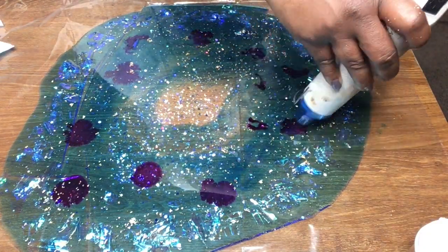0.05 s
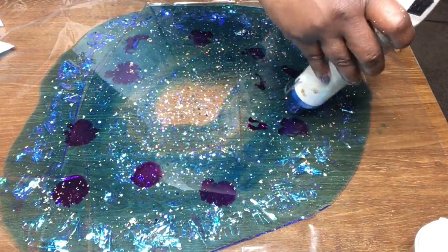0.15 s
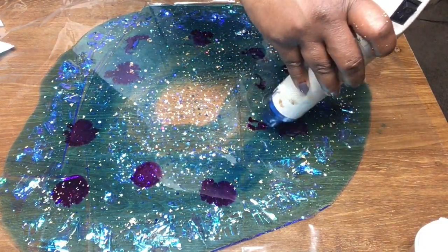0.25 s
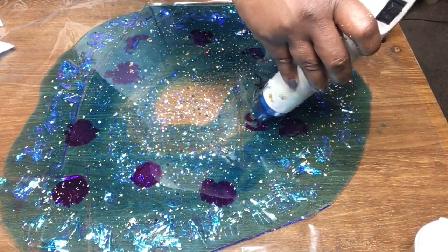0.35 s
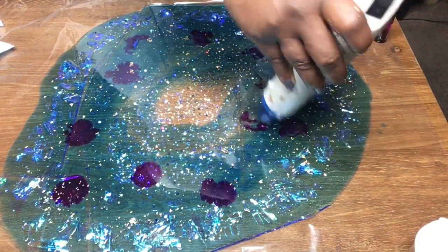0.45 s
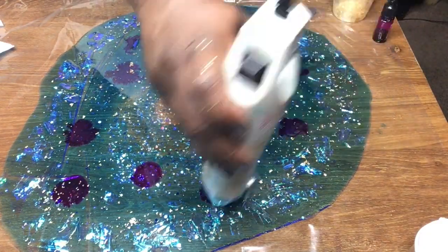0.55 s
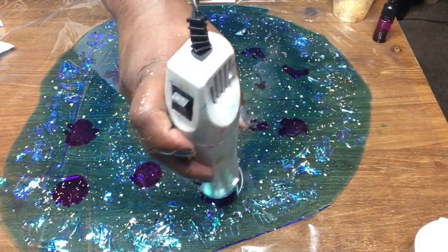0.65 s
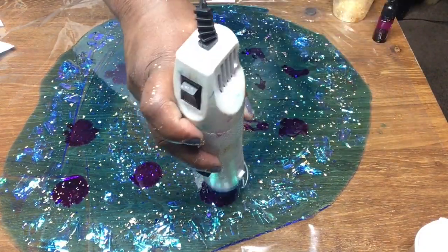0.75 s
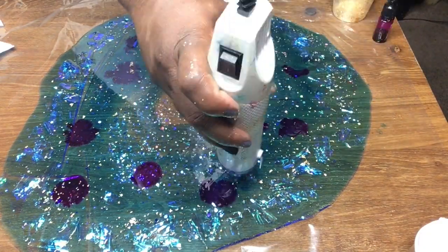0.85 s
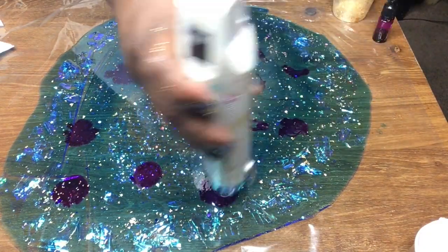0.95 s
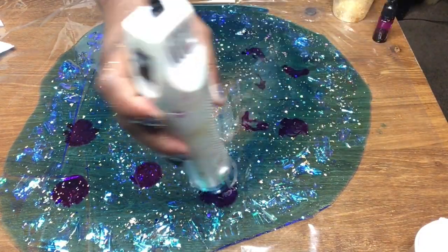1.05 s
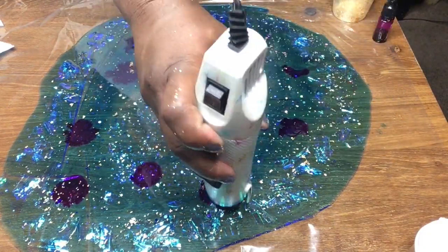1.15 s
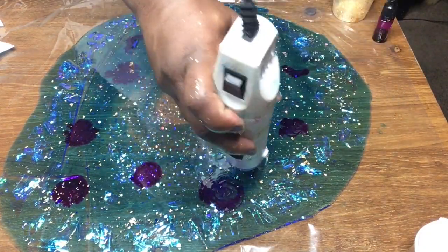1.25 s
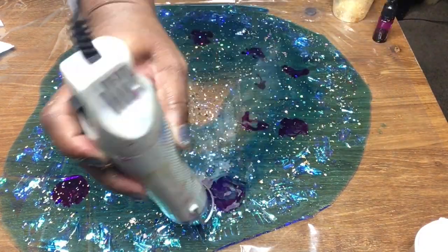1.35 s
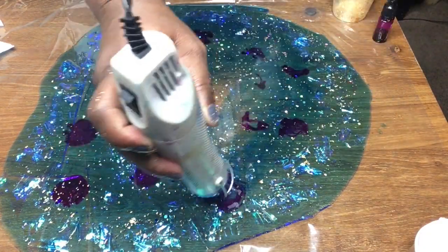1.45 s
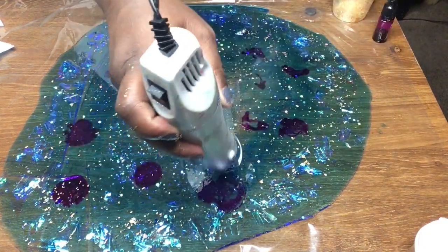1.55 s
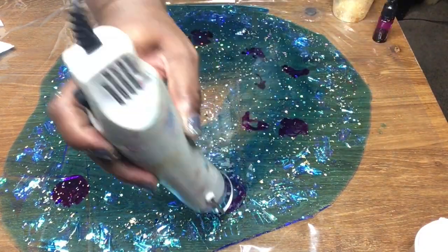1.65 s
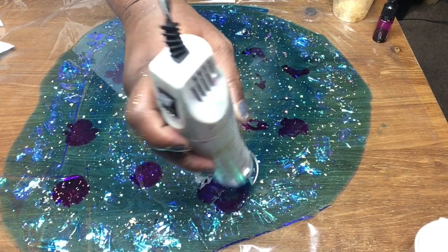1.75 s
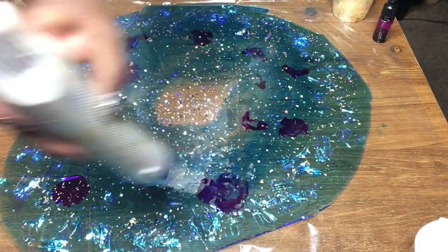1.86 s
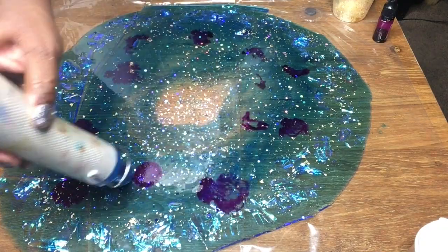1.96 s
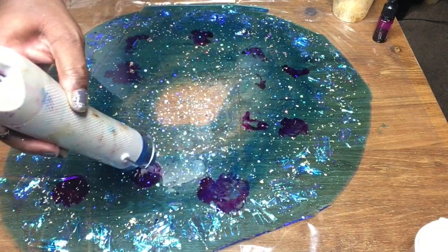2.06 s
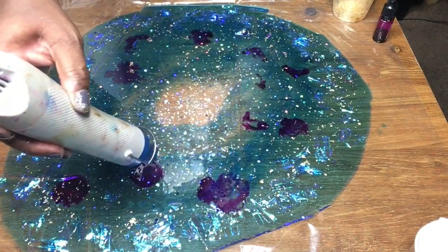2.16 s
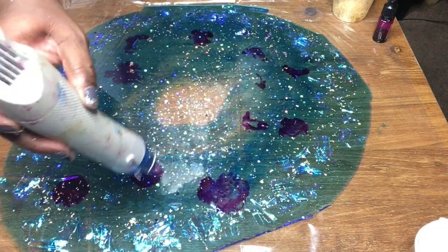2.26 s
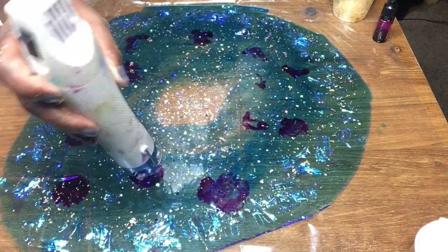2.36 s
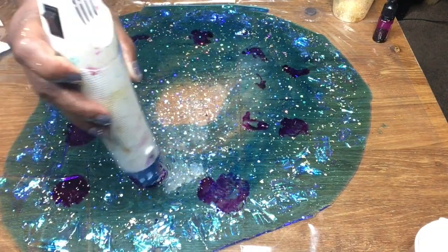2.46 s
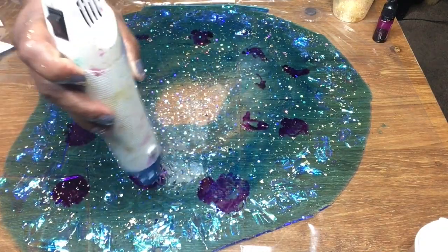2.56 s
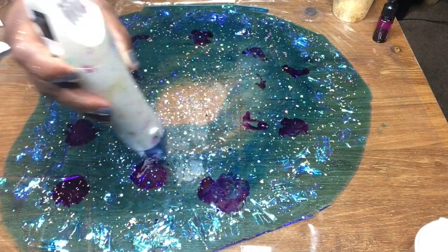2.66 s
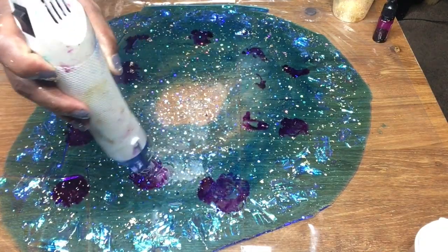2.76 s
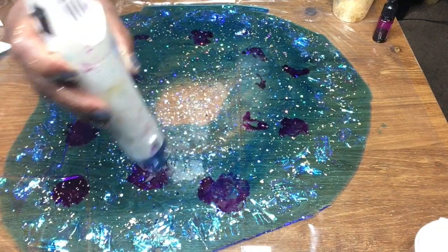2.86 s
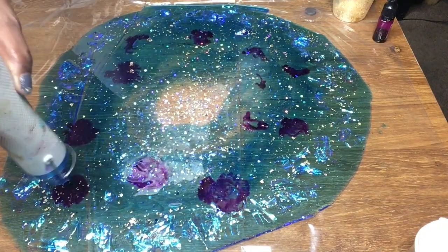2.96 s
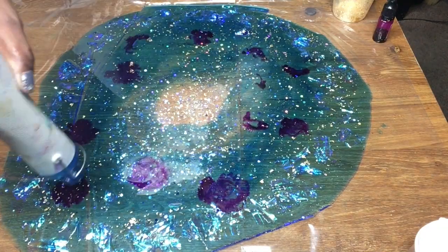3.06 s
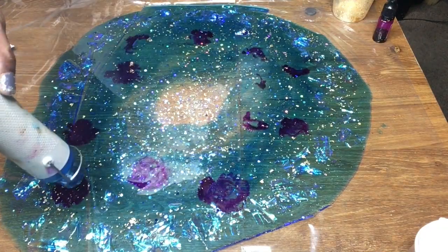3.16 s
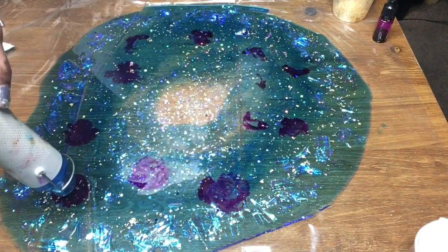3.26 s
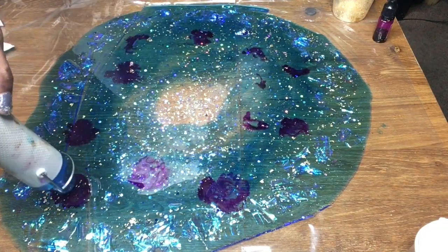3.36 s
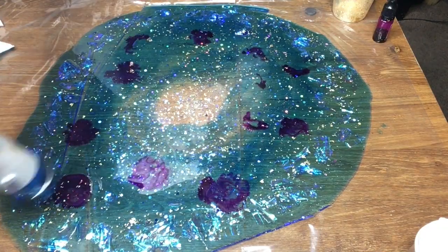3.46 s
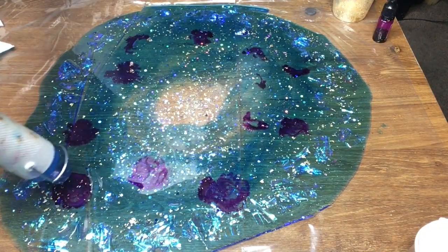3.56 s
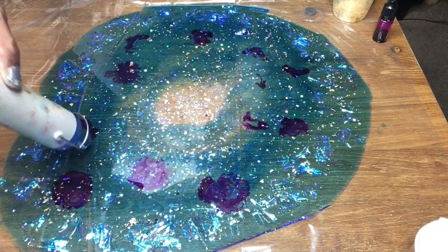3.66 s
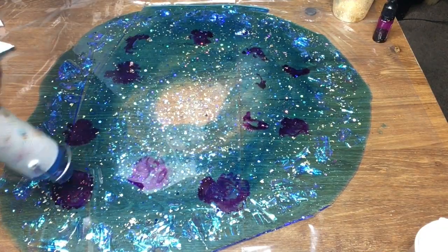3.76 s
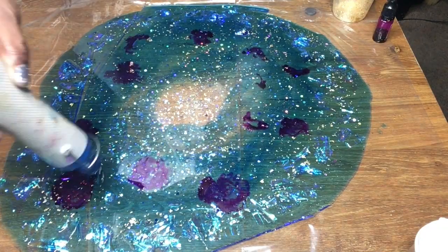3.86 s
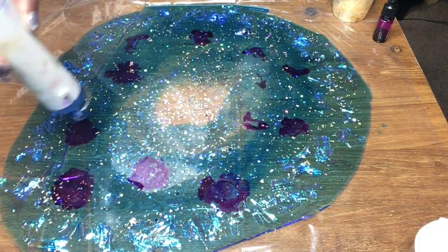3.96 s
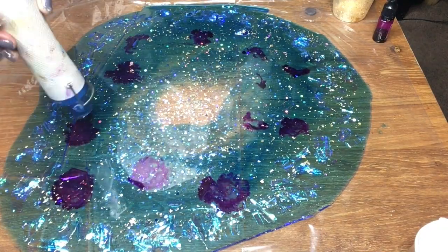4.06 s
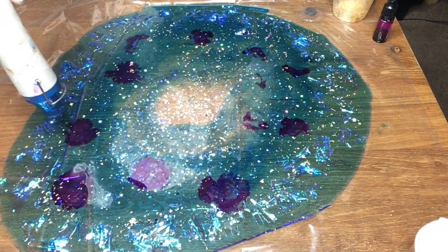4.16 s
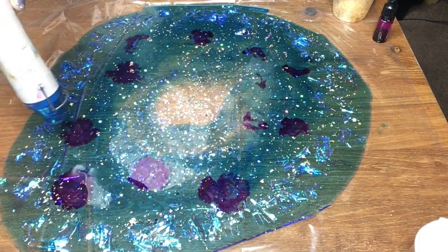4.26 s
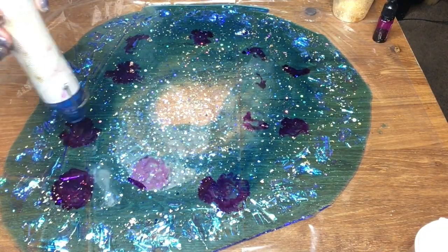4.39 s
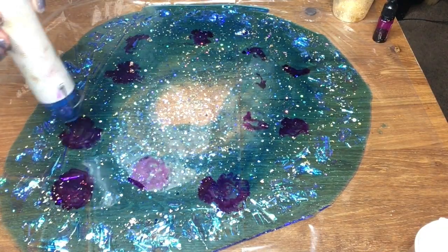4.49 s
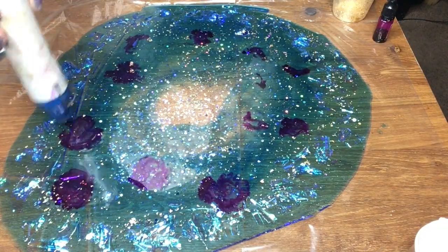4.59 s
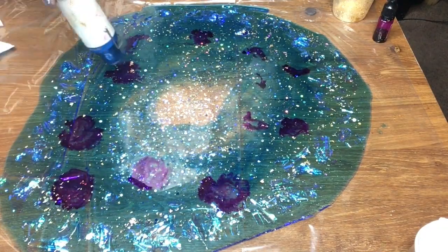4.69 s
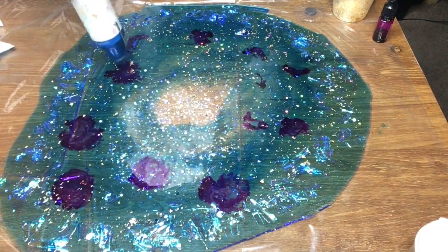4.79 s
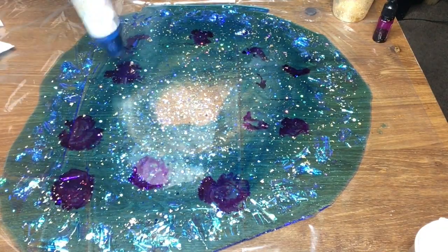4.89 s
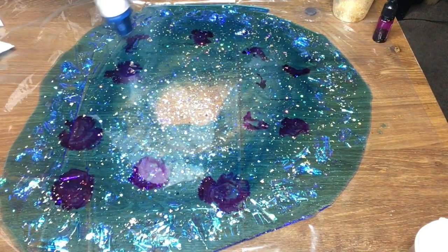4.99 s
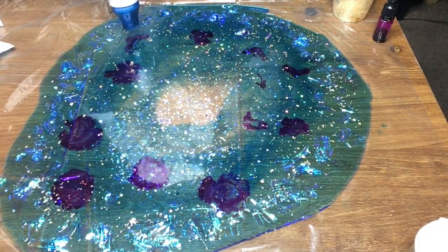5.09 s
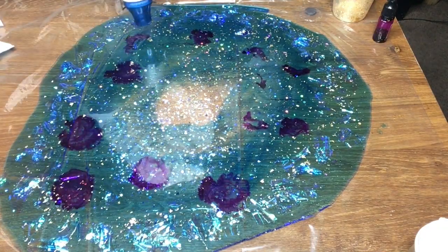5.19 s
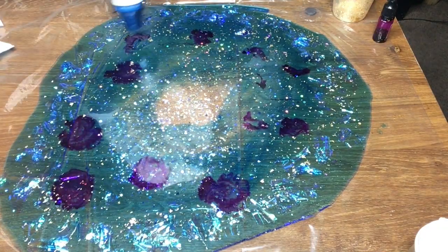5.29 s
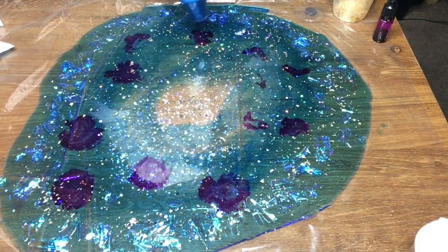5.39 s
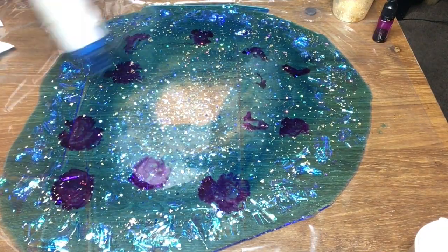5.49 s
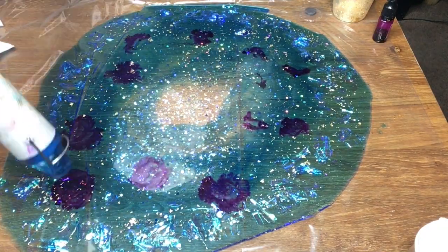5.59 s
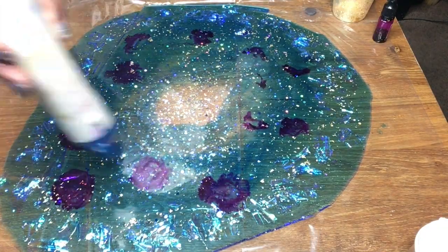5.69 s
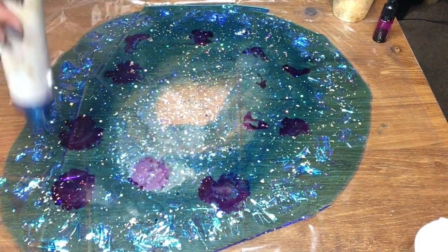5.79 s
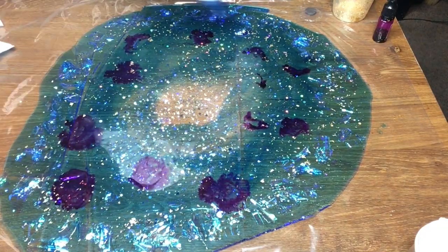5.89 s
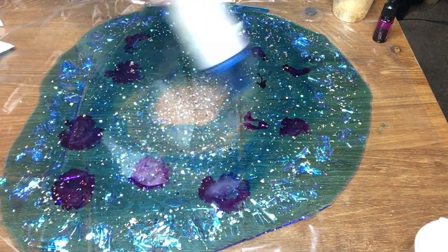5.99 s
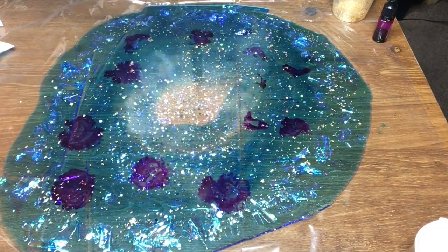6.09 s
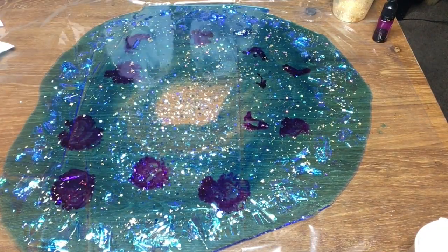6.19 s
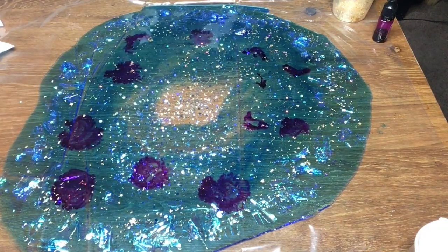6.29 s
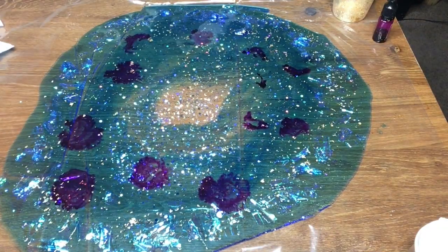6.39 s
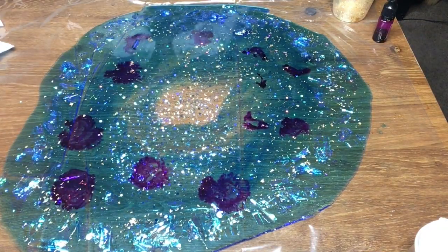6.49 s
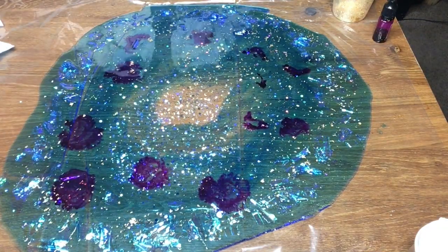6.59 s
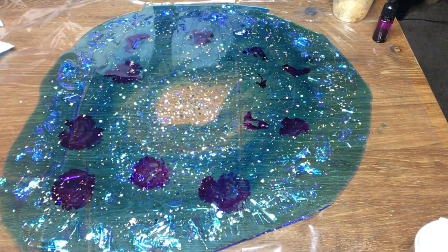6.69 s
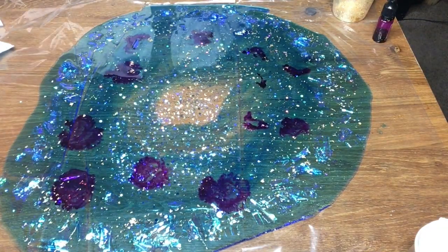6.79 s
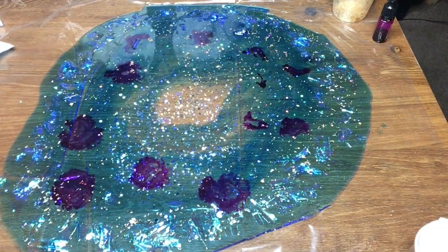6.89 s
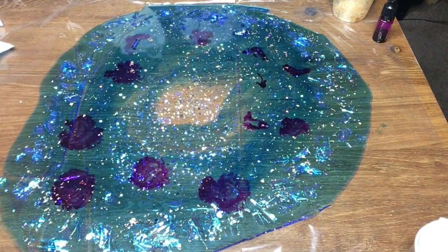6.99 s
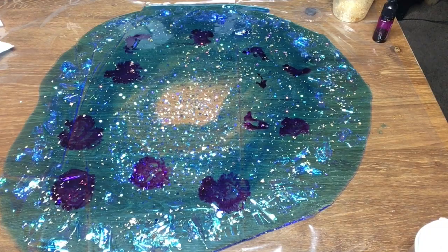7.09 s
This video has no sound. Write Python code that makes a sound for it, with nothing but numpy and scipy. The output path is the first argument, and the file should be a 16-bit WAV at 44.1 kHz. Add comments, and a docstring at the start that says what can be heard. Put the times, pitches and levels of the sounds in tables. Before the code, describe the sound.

High motor whine and hissing air come from a small heat gun moving over a work table, heard close up in a quiet room. The pitch stays nearly level while the airflow swishes slightly with each move. After about six seconds it clicks off and quickly dies away. A few light plastic clicks and knocks follow over the faint hum of another appliance.

```python
"""A seven-blade fan whines and air rushes through a barrel: a small heat gun, waved over a work table.
The table reflects the jet, so its colour shifts as the nozzle moves. Near the end the gun is switched
off, the fan runs down at once, and the plastic body clicks and knocks as it is put aside.
One microphone stands close by in a quiet room; some other small appliance hums faintly behind."""
import sys
import numpy as np
from scipy import signal
from scipy.fft import rfft, irfft, next_fast_len
from scipy.io import wavfile
from scipy.ndimage import map_coordinates

SR = 44100
rng = np.random.default_rng(int(sys.argv[2]) if len(sys.argv) > 2 else 0)


def bounce(signal):
    """Save signal as a 16-bit WAV file at the path given by the first command-line argument."""
    frames = np.transpose(np.atleast_2d(signal))
    limited = np.clip(frames, -1, 1)
    pcm = np.round(limited * 32767).astype(np.int16)
    wavfile.write(sys.argv[1], SR, pcm)


N = 314861
T = np.arange(N) / SR
BLADES, OFF_S = 7, 6.421  # the power is cut at OFF_S

# room tone: (frequency [Hz], relative density [dB])
ROOM_SPECTRUM = [(18, -79), (30, -49), (90, -48), (208, -27), (332, -18.5), (389, -13), (455, -19),
                 (532, -16), (709, -18), (1050, -14), (1140, -5.5), (1360, -22), (3880, -35), (10700, -39),
                 (14300, -44), (15700, -56)]
# faint hum in the background: (frequency [Hz], level [dB])
HUM_TONES = [(150, -103), (237, -84.5), (382, -86.5), (468, -81.5), (1265, -76)]
# thin drone, throbbing deeper once the gun is off: (time [s], pitch [Hz], level [dB], throb depth [0-1])
DRONE_TRACK = [(6.3, 1150, -68.5, .4), (6.5, 1137, -68, .9)]
# the room's decay: (frequency [Hz], t60 [s])
WALL_DECAY = [(200, 0.22), (2000, 0.15), (12000, 0.16)]

# switch and cord: (time [s], relative level [dB], dull share [dB], t60 [s])
SWITCH_TICKS = [(6.4127, -29, -16, 0.032), (6.5258, -39, -22, 0.031), (6.552, -55, -10, 0.037),
                (6.6368, -53, -11, 0.069), (6.655, -53, -1, 0.04), (6.6742, -54, 13, 0.035),
                (6.6964, -64, 17, 0.033), (6.767, -56, -2, 0.22), (6.8266, -52, -3, .04),
                (6.9975, -52, -1, 0.03)]
# body on table: (time [s], thud [dB], clack [dB], crack [dB], ring time [share of the free one])
BODY_KNOCKS = [(6.285, -50.5, -62, -65, 0.45), (6.325, -51, -62, -68, 0.53), (6.7336, -46, -57, -55, 0.74),
               (6.7381, -55, -48, -61, 0.45), (6.8014, -52, -40.5, -51.5, 0.8)]
# modes of the table's thud and the shell's clack: (frequency [Hz], relative level [dB], free t60 [s])
TABLE_MODES = [(541, -32, 0.031), (660, 2, 0.084), (915, -3, 0.036), (1295, -6, .04), (1800, -7, 0.057),
               (2050, -6, 0.037)]
SHELL_MODES = [(2280, -9, 0.044), (2570, -5, 0.054), (3000, -12, 0.052), (3070, -15, 0.044),
               (3380, -15, .04), (5652, -25, .06)]
# the rotor running down: (time [s], level [dB], frequency [Hz], width [s])
ROTOR_THUMP = (6.492, -64, 235, .006)

# bands of the air stream, low to high: (frequency [Hz], relative density [dB])
ROAR_SPECTRUM = [(140, -47), (300, -20.5), (400, -19), (750, -12.5), (860, -2.5), (960, -1.5), (1080, -9),
                 (1300, -2), (1470, 4.5), (1620, -1.5), (1780, 3.5), (1920, -2), (2600, -11), (4000, -42)]
BARREL_SPECTRUM = [(1600, -25), (2050, -5), (2250, -1.5), (2450, 1), (2750, -0.5), (2950, -9.5),
                   (3600, -24), (5000, -43)]
RUSH_SPECTRUM = [(1200, -16), (2500, -0.5), (3200, -1.5), (3550, -5.5), (3850, -6), (4500, -5), (5500, -23),
                 (8000, -44)]
HISS_SPECTRUM = [(3500, -35), (4600, -16), (5000, -3), (5300, -2.5), (5700, -0.5), (6400, -3.5),
                 (7100, -7.5), (7800, -6), (8500, -4), (9200, -7), (11000, -30)]
FIZZ_SPECTRUM = [(7000, -22), (8800, -9.5), (9800, 0), (11000, 1.5), (12100, -3), (12900, 0), (13600, 2.5),
                 (14500, 1), (15700, -0.5)]
# relative levels as the gun turns and moves: (time [s], barrel [dB], nozzle hiss [dB], fizz [dB])
AIR_LEVELS = [(0, -47, -47.5, -44), (.5, -47, -47, -46.5), (.63, -50.5, -44, -42), (1.3, -48.5, -45, -43),
              (1.5, -49.5, -45, -46), (2.5, -47.5, -45.5, -44.3), (3.3, -47, -47, -48),
              (3.75, -46.5, -46.5, -47.5), (4.55, -46.5, -48, -50.3), (4.95, -49.5, -51.3, -49.5),
              (5.45, -49, -55, -47.5), (5.68, -45, -46.5, -47.5), (5.95, -50, -48, -46.5),
              (6.08, -46.5, -50, -47), (6.24, -52, -49.5, -47), (6.36, -54, -51.5, -52)]
# the broad rush: (time [s], relative level [dB])
RUSH_DB = [(0, -57), (.5, -57.5), (.62, -54), (3.9, -54), (4.9, -51.5), (5.42, -54), (5.62, -50),
           (5.97, -57.5), (6.12, -50.5), (6.4, -60)]
# barrel resonance, shifting with the nozzle's gap to the table: (time [s], nominal centre [Hz])
BARREL_CENTRE = [(.5, 2542), (.68, 2451), (1.93, 2460), (2.07, 2553), (3.5, 2553), (4.15, 2657),
                 (4.7, 2652), (5.0, 2428), (5.4, 2458), (5.69, 2614), (6.25, 2525)]
# standing waves in the barrel: (frequency [Hz], width [Hz], boost [dB])
BARREL_MODES = [(1775, 31, 5.5), (2180, 54, -1), (2434, 25, 7), (2577, 16, 6.5), (2790, 40, 4),
                (2837, 45, 5.5), (2847, 76, -7.5), (3045, 60, 3), (3420, 150, 5.5), (3765, 77, 6),
                (5400, 82, 8.5), (5700, 70, 0), (6030, 80, 3.5)]
# table reflections, earlier with the nozzle held low: (time [s], near lag [ms], far lag [ms])
TABLE_LAGS = [(.48, 0.22, 1.15), (.62, .27, 1.45), (1.88, .27, 1.3), (2.03, .253, 1.08), (3.2, 0.25, 1.22),
              (4.0, .225, 1.03), (4.3, .225, 1.04), (4.7, .2, 0.99), (5.1, .16, .92), (5.3, .17, .86),
              (5.5, .176, .88), (5.6, .235, 1.04), (6.0, 0.25, .96)]
# bright band of hiss, gliding with the gap to the table: (time [s], nominal centre [Hz], level [dB])
SWISH_TRACK = [(.5, 12700, -55), (.62, 11000, -54), (1.9, 11040, -55), (2.1, 11060, -71), (4.0, 10180, -69),
               (4.35, 10330, -55), (4.95, 10630, -54.5), (5.25, 13030, -56), (5.5, 12830, -61),
               (5.62, 12500, -75)]

# the powered fan runs at one of two speeds: (time [s], blade-pass rate [Hz])
BLADE_RATE = [(1.28, 1724), (1.4, 1685), (2.3, 1691), (3.15, 1688), (3.6, 1689), (3.71, 1722), (4.22, 1721),
              (4.42, 1694), (4.62, 1681), (4.83, 1694), (4.92, 1719), (5.18, 1723), (5.4, 1695),
              (5.8, 1684), (6.04, 1698), (6.24, 1683), (6.4, 1697)]
# blade harmonics; the strong odd ones beam differently as the gun turns: (time [s], level [dB])
FIRST_DB = [(.6, -43.5), (.72, -62.5), (.82, -60), (.95, -53), (1.62, -55.5), (1.72, -48), (1.85, -55),
            (1.92, -47), (2.36, -49), (2.48, -56.5), (3.1, -55.5), (3.6, -50), (3.72, -44), (4.25, -45),
            (4.6, -63), (4.85, -50), (5.25, -44), (5.53, -45), (5.62, -52), (5.84, -55.5), (5.94, -44),
            (6.15, -50)]
SECOND_DB = [(.45, -60), (.62, -57), (1.7, -63), (2.1, -57), (3.0, -60.5), (4.1, -56), (4.7, -62),
             (5.0, -54), (5.45, -60.5), (5.7, -53), (5.9, -61.5), (6.1, -54), (6.4, -67)]
THIRD_DB = [(.55, -52), (.85, -58.5), (2.3, -60.5), (2.48, -53), (2.9, -66), (3.75, -51.5), (3.98, -58),
            (4.12, -47), (4.28, -46), (4.66, -52.5), (4.76, -62), (5.52, -65), (5.61, -51), (5.82, -61),
            (6.12, -47.5), (6.25, -62)]
FIFTH_DB = [(0, -50), (.78, -48), (.95, -56), (1.42, -44), (2.0, -45), (3.0, -43), (4.05, -43.5),
            (4.25, -55), (4.75, -50.5), (5.35, -54.5), (5.5, -58), (5.72, -48), (5.91, -45), (6.05, -50.5),
            (6.11, -40), (6.21, -53), (6.28, -44), (6.37, -61)]
# base level of the upper overtones: (time [s], level [dB])
UPPER_DB = [(.45, -58), (.62, -54.5), (1.25, -55.5), (1.5, -59), (1.85, -57), (2.1, -64.5), (4.0, -63),
            (4.5, -59), (4.95, -60), (5.2, -68), (5.5, -61), (6.3, -59.5)]
# upper harmonics and sidebands: (order [multiple of shaft speed], level over the base [dB])
SHAFT_OVERTONES = [(19, -17), (33, -11), (42, 0.5), (49, 0), (51, -11), (54, -15), (56, -1.5), (58, -14),
                   (61, -9), (63, -5)]
# how fast the hand swings the gun: (time [s], swing [0-1])
HAND_SWING = [(.5, 0.1), (.65, 0.8), (1.35, 0.9), (1.5, 0.3), (5.45, 0.33), (5.6, .8)]


def amp(db):
    """Decibels to gain."""
    return 10 ** (np.asarray(db) / 20)


def unit(x):
    """Scale to rms 1."""
    return x / np.sqrt(np.mean(x ** 2) + 1e-20)


def along(points, hz):
    """Read (Hz, value) points on a log axis."""
    f, v = np.transpose(points)
    return np.interp(np.log(hz + 1), np.log(f + 1), v)


def curves(rows):
    """One value per sample for each column after the time."""
    s, *cols = np.transpose(rows)
    return [np.interp(T, s, c) for c in cols]


def wobble(rate):
    """A smooth random curve, rate knots a second."""
    return map_coordinates(rng.standard_normal(int(N * rate / SR) + 4), [T * rate])


def filtered(x, response):
    """Shape x by a gain that depends on frequency."""
    m = next_fast_len(N + SR // 2)
    return irfft(rfft(x, m) * response(np.fft.rfftfreq(m, 1 / SR)), m)[..., :N]


def noise(spectrum):
    """Noise of rms 1 coloured by (Hz, dB) points, falling away below the lowest."""
    skirt = lambda hz: np.minimum(hz / spectrum[0][0], 1) ** 2
    return unit(filtered(rng.standard_normal(N), lambda hz: amp(along(spectrum, hz)) * skirt(hz)))


def sliding_noise(spectrum, speed):
    """Coloured noise, slid in pitch by reading it faster or slower."""
    return map_coordinates(noise(spectrum), [np.cumsum(speed)], mode="mirror")


def coast(slow_s):
    """Falls from 1 once the power is cut and friction brakes the rotor."""
    return np.exp(-np.maximum(T - OFF_S, 0) / slow_s)


def room_tone(throb_hz=5.25, throb_peak_s=6.665):
    """Behind the gun: a soft steady rush, an appliance's wavering hum and a thin, throbbing drone."""
    hum = sum(amp(db + 0.52 * wobble(7.9)) * np.sin(2 * np.pi * hz * T + 0.26 * wobble(8))
              for hz, db in HUM_TONES)
    drone_hz, drone_db, depth = curves(DRONE_TRACK)
    throb = 1 + depth * np.cos(2 * np.pi * throb_hz * (T - throb_peak_s))
    drone_gain = throb * amp(drone_db + 1.3 * wobble(9.9))
    drone = drone_gain * np.sin(2 * np.pi * np.cumsum(drone_hz) / SR + 0.45 * wobble(12))
    return amp(-67) * noise(ROOM_SPECTRUM) + np.sqrt(2) * (hum + drone)


def walls(x):
    """The walls answer briefly; the bass lingers longest."""
    hz, t, spectra = signal.stft(rng.standard_normal(SR // 2), SR, nperseg=256)
    decay = amp(-60 * t / along(WALL_DECAY, hz)[:, None])
    tail = signal.istft(spectra * decay, SR, nperseg=256)[1]
    return signal.fftconvolve(x, tail / np.linalg.norm(tail))[:N]


def rotor_thump():
    """A few soft, low cycles as the rotor runs down."""
    s, db, hz, width = ROTOR_THUMP
    return amp(db) * np.exp(-((T - s) / width) ** 2) * np.sin(2 * np.pi * hz * (T - s))


def ring(modes, t, ring_share):
    """Damped modes, struck at slightly new strengths each time."""
    return sum(amp(db + rng.normal(0, 1.53) - 60 * t / (t60 * ring_share)) * np.sin(2 * np.pi * hz * t)
               for hz, db, t60 in modes)


def handling():
    """At the table: plastic ticks, and bumps that ring table and shell, damped by the hand."""
    out, t = np.zeros(N + SR), np.arange(SR // 4) / SR
    bright = noise([(1500, -7), (4000, -4.5), (9000, -3.0), (15000, -8)])
    dull = noise([(700, 0), (2400, 0), (4500, -14), (9000, -38)])
    piece = lambda x: x[rng.integers(N - len(t)):][:len(t)]
    for s, db, dull_db, t60 in SWITCH_TICKS:
        tick = amp(db - 11.5 - 60 * t / t60) * piece(bright + amp(dull_db) * dull)
        out[round(s * SR):][:len(t)] += tick
    for s, thud_db, clack_db, crack_db, ring_share in BODY_KNOCKS:
        crack = amp(crack_db - 60 * t / 0.072) * piece(bright)
        thud = amp(thud_db) * ring(TABLE_MODES, t, ring_share)
        clack = amp(clack_db) * ring(SHELL_MODES, t, ring_share)
        out[round(s * SR):][:len(t)] += thud + clack + crack
    # small objects radiate little bass
    return signal.sosfilt(signal.butter(2, 330, "high", fs=SR, output="sos"), out[:N])


def table_reflections(x, usual_lag_ms=0.23):
    """The table adds two delayed copies, a comb that rises and deepens as the nozzle comes down."""
    near_ms, far_ms = curves(TABLE_LAGS)
    closeness = usual_lag_ms / near_ms
    oversampled = signal.resample_poly(x, 2, 1)
    late = lambda ms: map_coordinates(oversampled, [2 * SR * (T - ms / 1000)])
    return x + 0.19 * closeness ** 0.81 * late(near_ms) + 0.072 * closeness ** 1.9 * late(far_ms)


def air_column(x):
    """Standing waves in the barrel add narrow peaks and notches."""
    boost_db = lambda hz: sum(db / (1 + (2 * (hz - centre) / width) ** 2)
                              for centre, width, db in BARREL_MODES)
    return filtered(x, lambda hz: amp(boost_db(hz)))


def swish():
    """A bright, narrow band of hiss glides as the nozzle's distance from the table changes."""
    hz, db = curves(SWISH_TRACK)
    # the band's shape before it is slid up by about an octave
    shape = [(4000, -61), (5000, -12), (5300, 0), (5500, -1.5), (5750, -4), (6000, -20), (7500, -61)]
    return amp(db) * sliding_noise(shape, speed=hz / 5500) * coast(slow_s=0.028)


def air_stream(phase, chop, usual_hiss_db=-46.5):
    """Turbulence roars, rings the barrel and hisses at the nozzle; each blade chops the treble."""
    barrel_db, hiss_db, fizz_db = curves(AIR_LEVELS)
    centre_hz, rush_db = curves(BARREL_CENTRE) + curves(RUSH_DB)
    roar_db = -56.5 + 0.6 * (hiss_db - usual_hiss_db)
    roar = amp(roar_db + 0.47 * wobble(7)) * noise(ROAR_SPECTRUM)
    resonance = sliding_noise(BARREL_SPECTRUM, speed=centre_hz / 2530)
    barrel = amp(barrel_db - 1.5 + 0.34 * wobble(16)) * resonance
    rush = amp(rush_db + 0.66 + 0.8 * wobble(12)) * noise(RUSH_SPECTRUM)
    hiss = amp(hiss_db + 0.5 + 0.54 * wobble(12)) * noise(HISS_SPECTRUM)
    fizz = amp(fizz_db - 0.84 + 0.27 * wobble(7.2)) * noise(FIZZ_SPECTRUM)
    chopped = (hiss + fizz) * unit(1 + chop * np.sin(phase))
    # the barrel keeps sounding longest as the flow slows
    flow = barrel * coast(slow_s=0.06) + (roar + rush + chopped) * coast(slow_s=0.036)
    return table_reflections(air_column(flow))


def blade_phase(flutter):
    """Phase of the passing blades; the light rotor never turns quite evenly."""
    hz = curves(BLADE_RATE)[0] * coast(slow_s=0.106) * (1 + flutter * wobble(70))
    return 2 * np.pi * np.cumsum(hz) / SR


def fan_whine(phase, flicker_db=2.6, flicker_per_s=13):
    """Up close: blade harmonics and shaft orders, shaken by the turbulent intake and the swinging hand."""
    tracks = FIRST_DB, SECOND_DB, THIRD_DB, FIFTH_DB, UPPER_DB, HAND_SWING
    first_db, second_db, third_db, fifth_db, upper_db, swing = [curves(rows)[0] for rows in tracks]
    flicker = lambda: flicker_db * swing * wobble(flicker_per_s)
    shaft = phase / BLADES
    low = amp(first_db + 0.87 * flicker() + 0.32 * wobble(40)) * np.sin(phase)
    low += amp(-69 + 2.7 * wobble(5.7)) * np.sin(5 * shaft)
    high = amp(second_db + flicker() + 0.7 * wobble(30)) * np.sin(2 * phase)
    high += amp(third_db + flicker() + 1.8 * wobble(40)) * np.sin(3 * phase)
    high += amp(-59 + 2.6 * wobble(4) + 2.1 * wobble(30)) * np.sin(4 * phase)
    high += amp(fifth_db + flicker() + 1.1 * wobble(50)) * np.sin(5 * phase)
    for order, db in SHAFT_OVERTONES:
        overtone_db = upper_db + db + 1.7 * wobble(3) + flicker() + 2.2 * wobble(40)
        high += amp(overtone_db) * np.sin(order * shaft)
    # power off: the blade tone holds a moment, then collapses; overtones need speed and drop at once
    collapse = np.exp(-(np.maximum(T - OFF_S, 0) / 0.03) ** 4)
    return np.sqrt(2) * (low * collapse + high * coast(slow_s=0.016))


def scene():
    """Gun close and dry, a little room on the bumps; one microphone, alike in both channels."""
    phase = blade_phase(flutter=0.00045)
    gun = fan_whine(phase) + air_stream(phase, chop=0.15) + swish()
    bumps = handling() + rotor_thump()
    mono = gun + bumps + amp(-13) * walls(bumps) + room_tone()
    return np.array([mono, mono])


def record(dry):
    """A phone microphone: it cuts the deep bass and keeps nothing above its band limit."""
    low_cut_hz, top_hz = 120, 15760
    return filtered(dry, lambda hz: (hz < top_hz) * (1 - 0.8 / (1 + (hz / low_cut_hz) ** 6)))


dry = scene()
out = record(dry)
bounce(out)
```